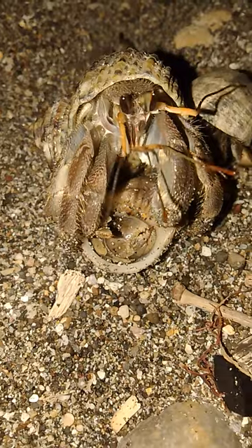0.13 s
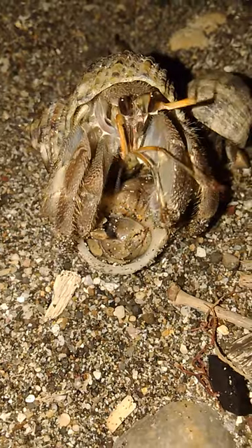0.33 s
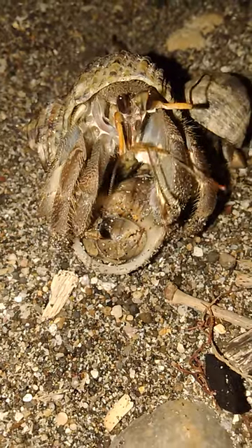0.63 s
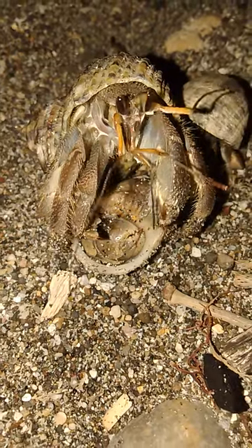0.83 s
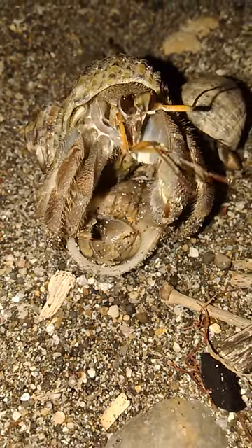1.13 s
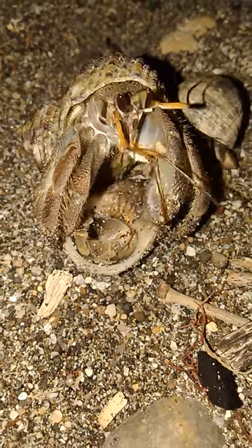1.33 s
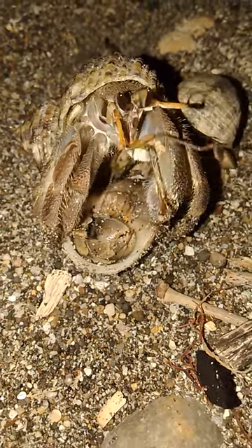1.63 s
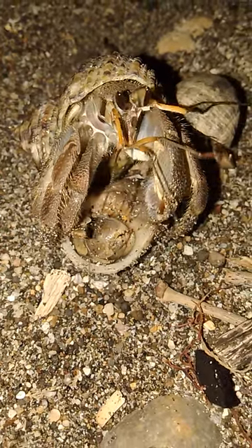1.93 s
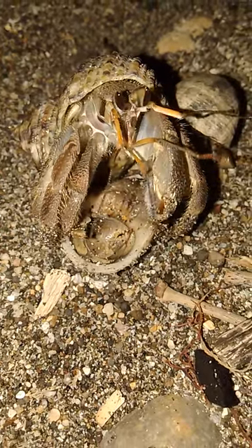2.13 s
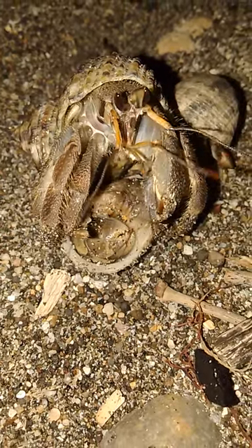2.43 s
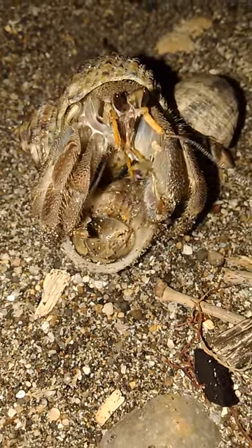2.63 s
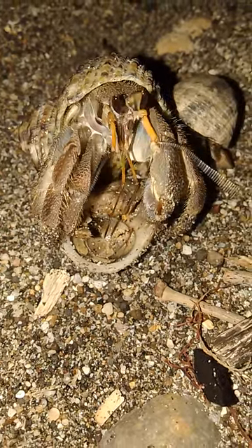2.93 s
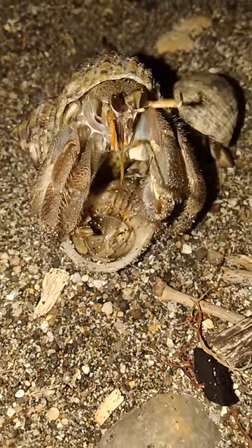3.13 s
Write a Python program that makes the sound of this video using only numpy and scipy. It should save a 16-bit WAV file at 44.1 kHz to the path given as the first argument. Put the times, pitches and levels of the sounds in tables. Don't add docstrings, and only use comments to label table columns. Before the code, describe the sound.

Surf washes softly on a night beach, ebbing then building, with faint crickets chirping above

```python
import sys
import numpy as np
from scipy import signal
from scipy.fft import rfft, irfft, next_fast_len
from scipy.io import wavfile
from scipy.ndimage import uniform_filter1d, map_coordinates

SR = 44100
rng = np.random.default_rng(int(sys.argv[2]) if len(sys.argv) > 2 else 0)


def level_to_linear(level):
    exponent = np.asarray(level, float) / 20
    return 10 ** exponent


def transcribe(signal):
    frames = np.atleast_2d(signal).T
    limited = np.clip(frames, -1, 1)
    pcm = np.round(limited * 32767).astype(np.int16)
    wavfile.write(sys.argv[1], SR, pcm)


N = 144207


def unit(x):
    return x / np.sqrt(np.mean(x ** 2) + 1e-20)


def curve(rows):
    return np.interp(np.arange(N) / SR, *np.transpose(rows))


def wobble(rate):
    knots = rng.standard_normal(400)
    return map_coordinates(knots, [np.arange(N) * min(rate, 100) / SR])


def filtered(x, response):
    m = next_fast_len(N + 8192)
    return irfft(rfft(x, m) * response(np.fft.rfftfreq(m, 1 / SR)), m)[:N]


def colour(points):
    f, db = np.transpose(points)
    return lambda hz: level_to_linear(np.interp(np.log(hz + 1), np.log(f + 1), db, -120, -120))


def patchy(depth_db):
    z = signal.stft(rng.standard_normal(N), nperseg=512)[2]
    field = uniform_filter1d(rng.standard_normal(z.shape), size=7, axis=0)
    field = uniform_filter1d(field, size=14, axis=1)
    return signal.istft(z * level_to_linear(depth_db * unit(field)), nperseg=512)[1][:N]


# frequency in Hz, density in dB per Hz.
HISS_COLOUR = [(3000, -6), (9000, -6), (12500, -2), (14500, -2), (16000, 3)]


def microphone_hiss():
    return level_to_linear(-98) * unit(filtered(rng.standard_normal(N), colour(HISS_COLOUR)))


# time in seconds, engine cycles per second.
ENGINE_SPEED = [(0, 15.25), (1.3, 15.25), (2.2, 15.33), (3.27, 15.35)]
ENGINE_ORDERS = [4, 8, 10, 11, 12, 12.245, 12.9, 14, 18, 20, 22]
ENGINE_ORDERS_DB = [-70, -78, -62, -63, -66, -61, -66, -70, -67, -70, -73.5]
# time in seconds, gain in dB.
BREEZE = [(.05, 1), (.2, 1.5), (.35, 0), (.5, -2), (.65, 3), (.85, -0.5), (1.0, 1), (1.15, 2.5), (1.4, 0.5),
          (1.6, -3), (1.9, .6), (2.05, -1), (2.3, -3.5), (2.45, 0), (2.6, -3), (2.8, 0), (3.0, 0.5),
          (3.27, -0.5)]


def generator():
    fade_db, fades_per_s = 1.5, 3.69
    slip_rad, slips_per_s = 0.44, 4.2
    cycles = np.cumsum(curve(ENGINE_SPEED)) / SR
    drone = np.zeros(N)
    for order, db in zip(ENGINE_ORDERS, ENGINE_ORDERS_DB):
        level = np.sqrt(2) * level_to_linear(db + fade_db * wobble(fades_per_s))
        phase = 2 * np.pi * (order * cycles + rng.random())
        drone += level * np.sin(phase + slip_rad * wobble(slips_per_s))
    return level_to_linear(curve(BREEZE)) * drone


# centre in Hz, width in Hz, rms level in dB.
CHORUS_BANDS = [
    (6750, 480, -88.5),
    (7200, 200, -93),
    (8300, 560, -88.5),
]


def insect_chorus():
    out = np.zeros(N)
    for centre, width, db in CHORUS_BANDS:
        band = filtered(patchy(depth_db=1.0), lambda f: np.exp(-((f - centre) / width) ** 2))
        out += level_to_linear(db) * unit(band)
    return out


def cricket(chirps, song_hz, song_db):
    stroke_gap_s, stroke_width_s = .0169, .004
    fall_hz_per_s, pitch_scatter = 12000, .007
    lead = 2000
    half = 700
    out, t = np.zeros(N + SR), np.arange(-half, half) / SR
    envelope = np.exp(-(t / stroke_width_s) ** 2 / 2)
    for s, over_db in chirps:
        for stroke, (pitch, loudness, late_ms) in enumerate(rng.standard_normal((5, 3)), -2):
            hz = song_hz * (1 + pitch_scatter * pitch)
            tone = np.sin(2 * np.pi * (hz * t - fall_hz_per_s * t * t / 2))
            size = level_to_linear(song_db + over_db + loudness / 2) * np.exp(-stroke ** 2)
            start = round((s + stroke * stroke_gap_s + late_ms / 1000) * SR) + lead
            out[start:][:len(t)] += size * envelope * tone
    return out[lead + half:][:N]


# middle in seconds, level in dB over its song.
FAR_CHIRPS = [(.17, 0), (.28, -2), (.39, 0), (.51, -1), (.615, -1), (.722, 3), (.835, 0), (.95, -5),
              (1.06, -4), (1.175, -3), (1.285, -2), (1.395, 2), (1.51, -3), (1.618, 2), (1.73, -1),
              (1.845, -1), (1.96, 0), (2.075, -2), (2.2, -1), (2.328, 3), (2.435, -1), (2.52, 3),
              (2.63, -5), (2.74, 1), (2.848, 4), (2.96, 2), (3.07, -1), (3.18, 0)]


def far_cricket():
    return cricket(FAR_CHIRPS, song_hz=6830, song_db=-78)


# middle in seconds, level in dB over its song.
NEAR_CHIRPS = [(.102, 0), (.218, -5), (.338, -1), (.447, -1), (.573, 1), (.69, -5), (.805, 1), (.925, -2),
               (1.037, -1), (1.163, 2), (1.293, 0), (1.457, 0), (1.565, -1), (1.701, 1), (1.822, 2),
               (1.941, 2), (2.06, 0), (2.178, 3), (2.29, 1), (2.42, -3), (2.548, 4), (2.668, -1),
               (2.785, 1), (2.9, 0), (3.012, 3), (3.135, 0), (3.258, -3)]


def near_cricket():
    return cricket(NEAR_CHIRPS, song_hz=6530, song_db=-75.5)


# start in seconds, level in dB, ring in Hz, 60 dB decay in seconds.
SAND_TICKS = [
    (.6194, -63, 8300, .006),
    (1.0243, -55, 7900, .002),
    (1.0243, -61, 5200, .002),
    (1.0243, -67, 11500, .0015),
    (1.0243, -70, 15300, .003),
    (1.72, -66, 12000, .001),
]


def sand_ticks():
    rise_s = .00012
    out, t = np.zeros(N), np.arange(3000) / SR
    for s, db, hz, t60 in SAND_TICKS:
        envelope = level_to_linear(db - 60 * t / t60) * (1 - np.exp(-t / rise_s))
        out[round(s * SR):][:len(t)] += envelope * np.sin(2 * np.pi * hz * t)
    return out


def foam():
    bubbles_per_s, middle_hz, life_cycles = 900, 914, 5.3
    draw = rng.random((round(bubbles_per_s * N / SR), 2))
    hz = middle_hz * np.exp(0.535 * rng.standard_normal((len(draw), 1)))
    k = np.arange(700)
    cycles = k / SR * hz
    size = level_to_linear(-3 * np.log(draw[:, 1:] + 1 / 20))
    grain = size * np.sin(2 * np.pi * cycles) * cycles * np.exp(-3 * cycles / life_cycles)
    at = (draw[:, :1] * N).astype(int) + k
    return unit(np.bincount(at.ravel(), grain.ravel())[:N])


# time in seconds, surf strength in dB.
WAVE_STRENGTH = [(.05, -57.5), (.16, -59), (.3, -60), (.55, -62), (.9, -64), (1.18, -60.5), (1.55, -60.5),
                 (1.78, -59.5), (2.05, -59.5), (2.22, -59.5), (2.36, -60), (2.62, -58.5), (2.85, -56),
                 (3.03, -56.5), (3.27, -53)]
# frequency in Hz, density in dB per Hz.
WASH_COLOUR = [
    (180, -28.5),
    (330, -8.5),
    (790, -4),
    (1560, -10),
    (3140, -21),
    (5600, -31),
    (9000, -34.5),
    (13000, -61.5),
]
# frequency in Hz, density in dB per Hz.
ROAR_COLOUR = [
    (20, -5.5),
    (60, -2.5),
    (120, -1),
    (175, -1),
    (240, -3.5),
    (330, -9),
    (600, -19),
    (1200, -53.5),
]


def surf():
    strength_db = curve(WAVE_STRENGTH)
    surge_db = .5 * wobble(4.01) + 0.34 * wobble(11)
    wash = unit(filtered(patchy(depth_db=0.09), colour(WASH_COLOUR))) + level_to_linear(-8.5) * foam()
    roar = unit(filtered(patchy(depth_db=0.7), colour(ROAR_COLOUR)))
    swing_db = strength_db - strength_db.mean()
    roar_db = -56 + 0.34 * swing_db
    return level_to_linear(strength_db + 0.08 + surge_db) * wash + level_to_linear(roar_db) * roar


# peak in seconds, rms in dB, width in seconds,
# centre in Hz, spread in octaves.
BREAKERS = [(.17, -59.5, 0.068, 400, 0.29), (.18, -62, 0.061, 1100, 0.47), (.3, -71, 0.037, 380, 0.4),
            (1.02, -76, 0.012, 4200, .1), (1.2, -71, 0.16, 550, 0.37), (1.36, -73, 0.12, 2460, 0.49),
            (2.18, -64.5, 0.21, 750, .4), (2.4, -73.5, .2, 2000, 0.46), (2.6, -58, 0.044, 287, 0.34),
            (2.68, -63, .08, 990, 0.45), (2.83, -61, 0.09, 394, 0.43), (3.03, -60.5, 0.11, 1100, 0.51),
            (3.08, -60.5, 0.097, 400, 0.4)]


def plunging_breakers():
    t, water = np.arange(N) / SR, patchy(depth_db=4.5)
    out = np.zeros(N)
    for s, db, width, hz, spread in BREAKERS:
        boom = unit(filtered(water, lambda f: np.exp(-(np.log2((f + 1) / hz) / spread) ** 2)))
        out += level_to_linear(db) * np.exp(-((t - s) / width) ** 2) * boom
    return out


# start in seconds, level in dB, pitch in Hz, life in cycles.
AIR_POCKETS = [
    (.15, -60, 440, 14),
    (.185, -60, 385, 14),
    (2.095, -56, 660, 9),
    (2.37, -60, 750, 12),
    (2.81, -61, 400, 14),
    (2.862, -47, 720, 4),
    (3.008, -65.5, 775, 30),
    (3.06, -60, 420, 12),
]


def air_pockets():
    t, out = np.arange(N) / SR, np.zeros(N)
    for s, db, hz, life in AIR_POCKETS:
        cycles = np.maximum(t - s, 0) * hz
        out += level_to_linear(db) * cycles * np.exp(-3 * cycles / life) * np.sin(2 * np.pi * cycles)
    return out


def scene():
    background = generator() + insect_chorus() + far_cricket()
    close = near_cricket() + sand_ticks()
    water = surf() + plunging_breakers() + air_pockets()
    return (background + close + water)[None]


def top_cut(x):
    return signal.sosfilt(signal.butter(12, 15720, fs=SR, output="sos"), x)


def record(dry):
    open_s, offset = .03625, .0129
    is_open = np.arange(N) >= open_s * SR
    return top_cut((dry + microphone_hiss() + offset) * is_open)


dry = scene()
out = record(dry)
transcribe(out)
```